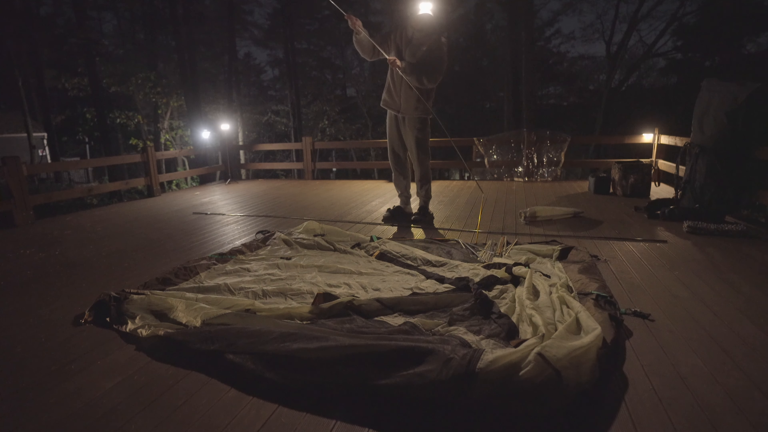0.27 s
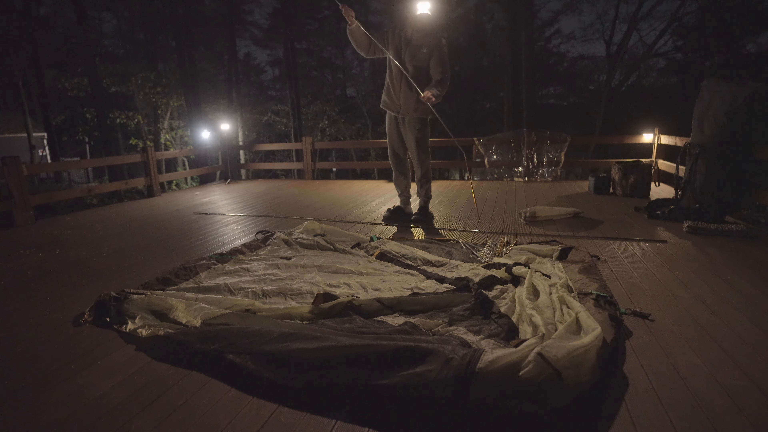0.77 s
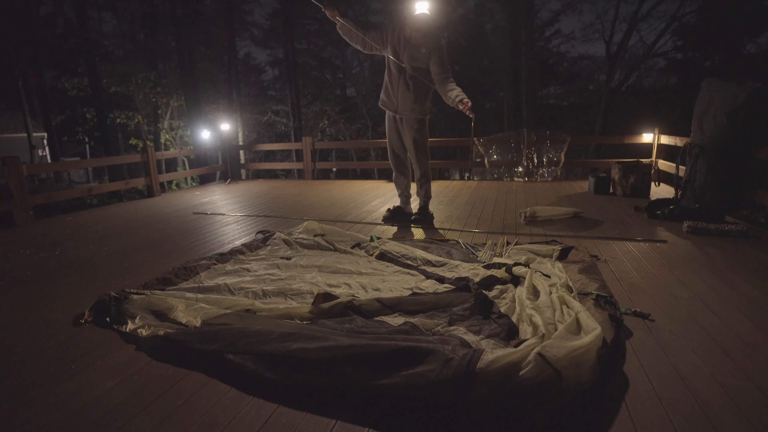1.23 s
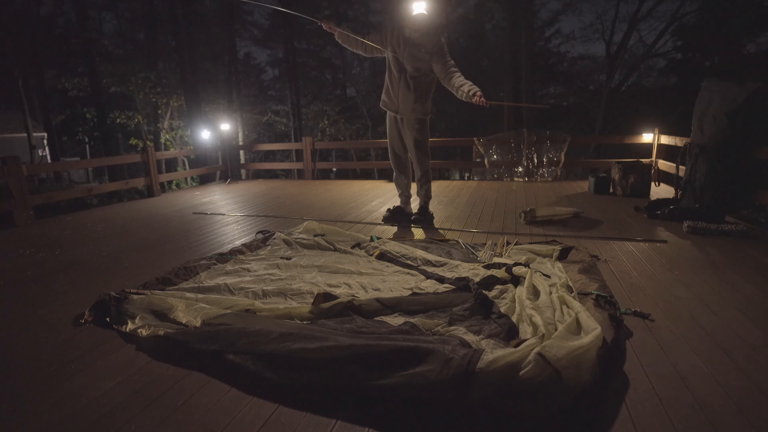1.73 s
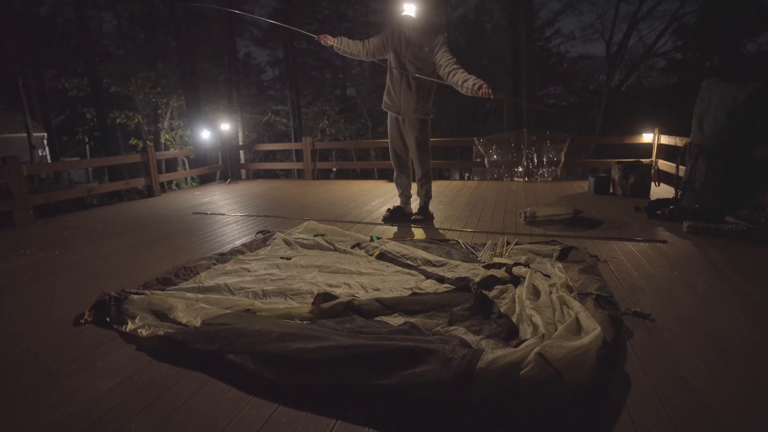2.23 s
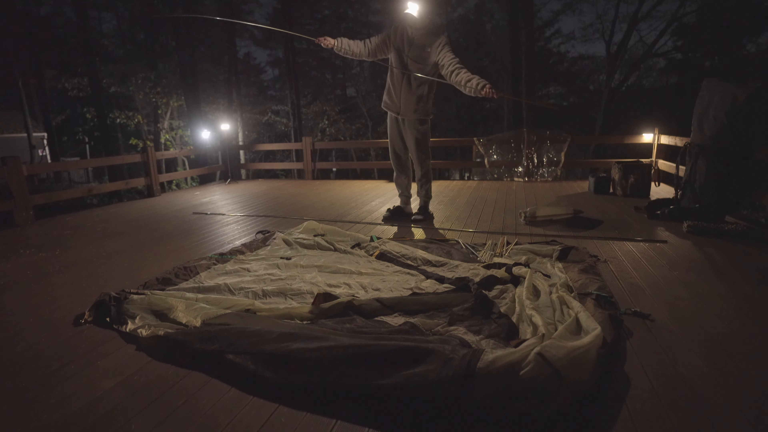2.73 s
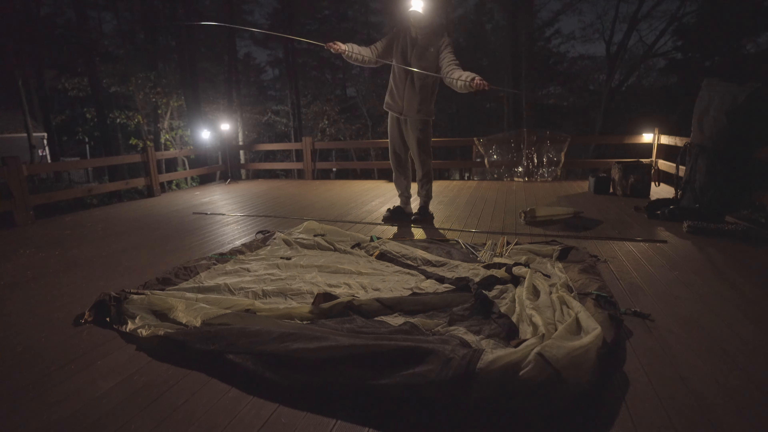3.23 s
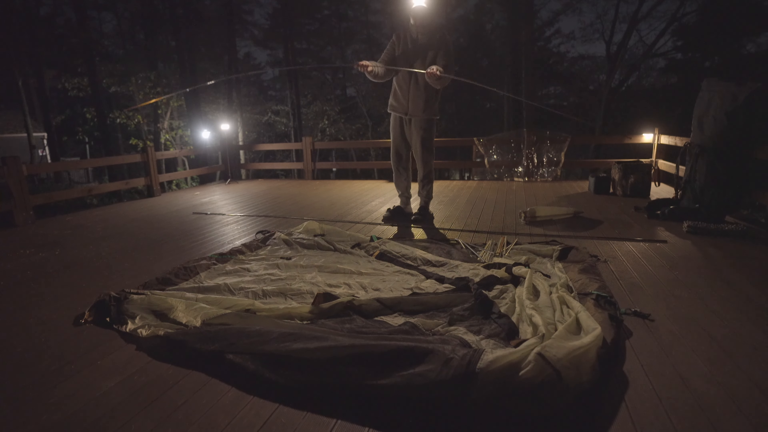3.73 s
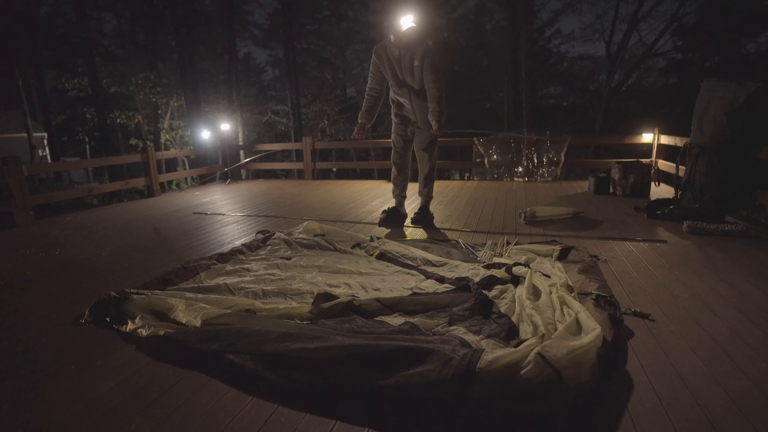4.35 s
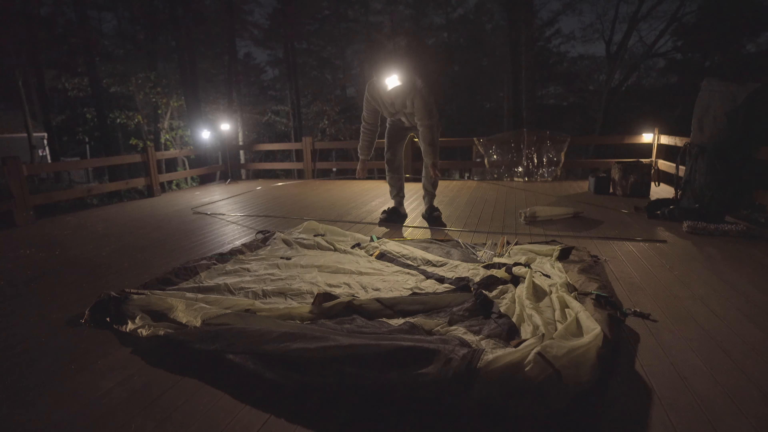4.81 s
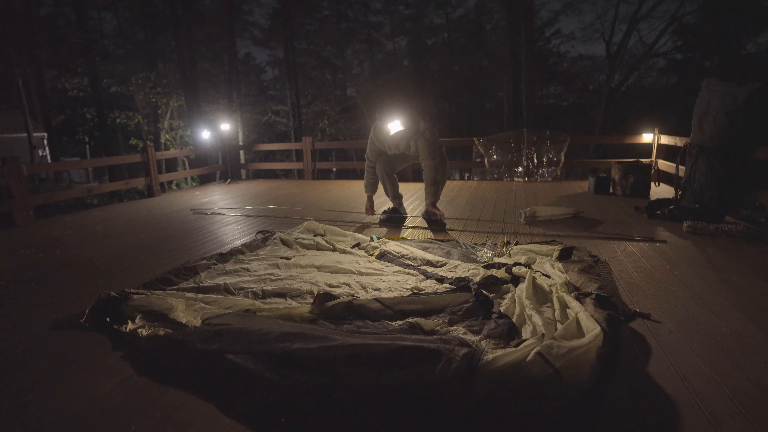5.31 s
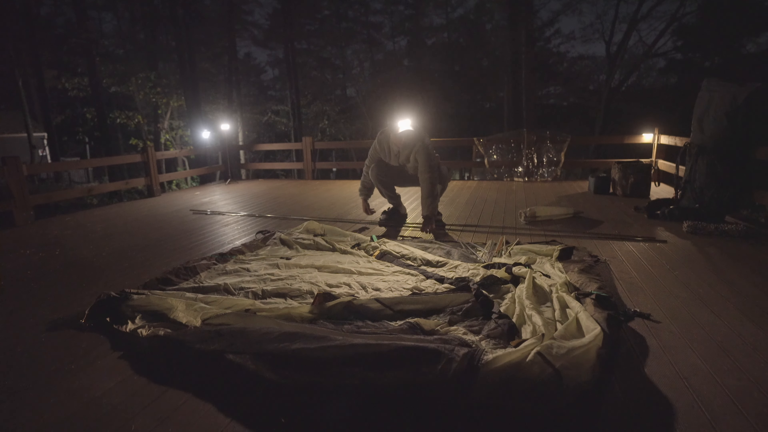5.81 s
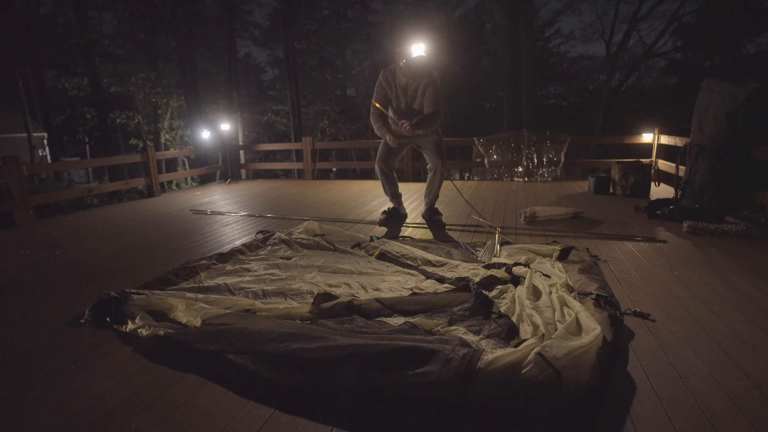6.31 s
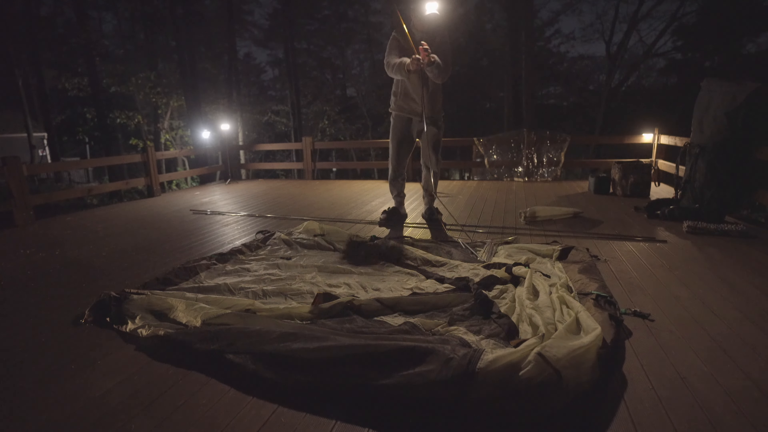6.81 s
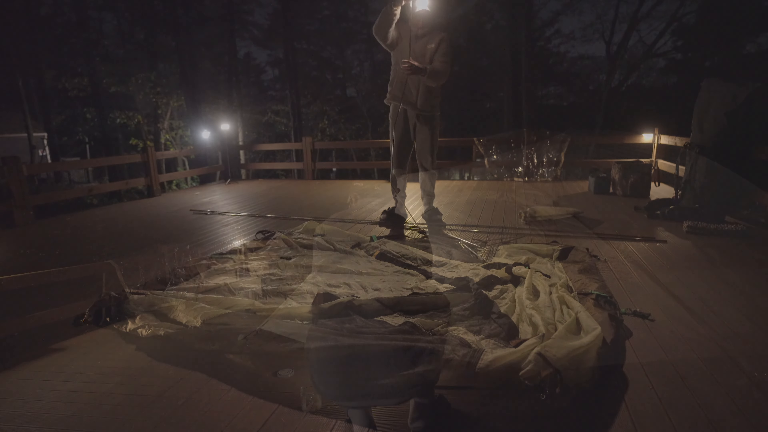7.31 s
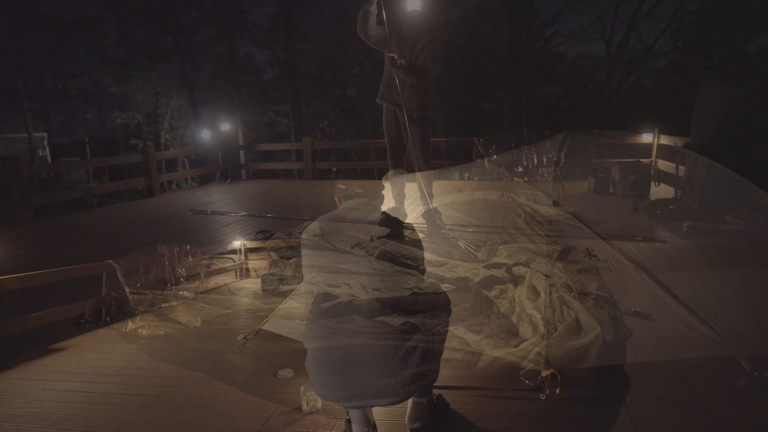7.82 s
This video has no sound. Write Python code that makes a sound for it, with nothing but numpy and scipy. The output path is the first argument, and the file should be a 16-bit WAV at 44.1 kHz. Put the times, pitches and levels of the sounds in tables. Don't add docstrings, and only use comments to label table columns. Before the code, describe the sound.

Close stereo pickup on a quiet outdoor wooden deck at night. A bright metallic snap opens, followed by small ticks and near silence with a few isolated clicks. Midway, thin tent poles drop, clattering and knocking on hollow boards. Then scrapes, nylon rustle and crisp joint snaps come in dense irregular bursts, ending with a short zip buzz.

```python
import sys
import numpy as np
from scipy import signal
from scipy.fft import rfft, irfft, next_fast_len
from scipy.io import wavfile
from scipy.ndimage import uniform_filter1d, map_coordinates

SR = 44100
rng = np.random.default_rng(int(sys.argv[2]) if len(sys.argv) > 2 else 0)


def voltage_ratio(level):
    return 10 ** (np.asarray(level, float) / 20)


def to_wav(sig):
    pcm = np.clip(np.atleast_2d(sig), -1, 1) * 32767
    pcm = np.round(pcm).astype(np.int16)
    wavfile.write(sys.argv[1], SR, pcm.T)


N = 355887
LENGTH = 16384
T = np.arange(LENGTH) / SR
HZ = np.fft.rfftfreq(LENGTH, 1 / SR)

# (frequency [Hz], width [Hz], level [dB])
TUBE_MODES = [(2590, 660, -7), (3920, 235, 10.5), (5000, 1700, -18), (5630, 160, 3), (7660, 310, -19),
              (8280, 220, 4), (10300, 140, -14), (11220, 240, 4), (12700, 140, -6), (13260, 250, 3),
              (14100, 130, -10)]
# (time [s], peak level [dB], loudest ring [Hz], presence under 5 kHz [dB])
SNAPS = [(0.0317, -3, 9500, -23), (1.3121, -28, 3710, -14.5), (1.355, -32.5, 7600, -15),
         (1.3967, -24.5, 14600, -16), (2.363, -9.5, 7220, -18), (6.0584, -27, 2500, -2),
         (6.112, -22.5, 10600, -20), (6.3719, -17.5, 7500, -16), (6.4442, -6, 14100, -14.5),
         (6.5066, -12, 10740, -13), (6.7469, 0.5, 14800, -29.5), (6.7625, -10.5, 8800, -21.5),
         (7.7332, -28.5, 6450, -24), (7.7792, -33.5, 8810, -16), (7.8014, -14, 7160, -13.5),
         (7.8816, -29, 13100, -17), (7.8965, -7.5, 10000, -18.5)]
# (time [s], peak level [dB], loudest ring [Hz], presence under 5 kHz [dB])
REBOUNDS = [(.0331, -4, 4800, -14.5), (.0345, -9, 2800, -8), (.052, -14, 8800, -15), (.066, -19, 9000, -18),
            (.0905, -39, 2800, -5), (.1035, -32, 3200, -5), (1.3175, -31, 3920, -10),
            (1.3995, -26, 7850, -13), (1.4125, -34, 14500, -12), (2.3645, -11, 12800, -14.5),
            (5.9353, -34, 7470, -12), (6.451, -17, 5910, -6), (6.5565, -29, 4000, -4),
            (6.6467, -23, 2580, -12), (6.668, -13, 6040, -16), (6.678, -16, 9000, -15),
            (6.712, -24, 6000, -17), (6.9145, -9, 11500, -22), (6.924, -12, 13500, -21),
            (6.9984, -24, 15500, -25), (7.2585, -20, 13500, -14), (7.267, -21, 12500, -6),
            (7.4564, -39, 2750, -5), (7.81, -37, 14900, -18), (7.819, -33, 12700, -25),
            (7.8585, -36, 12000, -16)]
# (time [s], peak level [dB], loudest ring [Hz], presence under 5 kHz [dB])
CLATTER = [(4.8584, -14, 6450, -11), (4.9047, -30.5, 4040, -4), (5.058, -21.5, 3800, -7.5),
           (5.1034, -11, 3630, -13), (5.4163, -10, 7260, -9), (5.423, -6, 2530, -11.5),
           (5.4994, -13, 3770, 3), (5.5074, -11.5, 3570, -8.5), (5.566, -3, 7100, -11.5),
           (5.6082, -17, 4230, -12), (5.6214, -20.5, 2850, -23), (5.651, -12.5, 2780, -22),
           (6.904, -2, 15600, -19.5), (7.0903, -13.5, 4100, 2), (7.1518, -10, 8300, -18.5),
           (7.224, -10, 4080, -7), (7.2394, -15, 4050, 22), (7.2969, -15.5, 3730, -13)]
# (time [s], peak level [dB], loudest ring [Hz], presence under 5 kHz [dB])
BRUSHES = [
    (.046, -12, 8800, -18.5),
    (5.8092, -31.5, 5340, -18),
    (5.8461, -27, 10440, -12),
    (5.85, -24.5, 5750, -12.5),
    (6.0117, -27, 7530, -13),
    (6.659, -14, 6040, -11),
    (6.8435, -29, 12700, -14),
    (7.0404, -15.5, 12000, -18.5),
    (8.051, -21, 15500, -9),
]
# (time [s], peak level [dB], loudest ring [Hz], presence under 5 kHz [dB])
SCUFFS = [
    (5.9744, -29, 8250, -11),
    (6.256, -25.5, 8450, -9),
    (6.2786, -15, 6800, -17),
    (6.636, -18, 3900, -9),
    (7.0687, -5, 14440, -10),
]
# (time [s], peak level [dB], loudest ring [Hz], presence under 5 kHz [dB])
TICKS = [
    (0.111, -26, 6900, -12),
    (0.1615, -30, 2650, -13),
    (0.254, -38.5, 6070, -10),
    (0.547, -31, 8500, -16),
    (0.588, -43, 3430, -3),
    (0.6509, -40, 10600, -21),
    (4.2048, -45, 2980, 15),
    (4.5765, -38, 2700, 2),
    (7.59, -45, 2800, 10),
]
# (t60 [s], treble over 11 kHz [dB])
SNAP, REBOUND, CLANK = (0.05, -16), (0.038, -17), (0.068, -19)
BRUSH, SCUFF, TICK = (0.087, -17.5), (0.15, -14), (0.062, -14)


def metal_contacts():
    out = np.zeros((2, N + LENGTH))
    groups = [(SNAPS, SNAP), (REBOUNDS, REBOUND), (CLATTER, CLANK), (BRUSHES, BRUSH), (SCUFFS, SCUFF), (TICKS, TICK)]
    for table, (t60, treble_db) in groups:
        rise = .00015 + .06 * t60 ** 2
        for s, db, ring_hz, presence_db in table:
            slope = [(800, presence_db - 13), (2600, presence_db), (4500, presence_db + 1.5),
                     (7000, -10.5), (9500, -13.0), (12000, treble_db + 2.0)]
            modes = 0.97 + resonant(TUBE_MODES, HZ, vary_db=2.5) + resonant([(ring_hz, 420, 7)], HZ)
            crack = burst(t60, rise=rise, snap_db=15 - 136 * t60, tail_db=-17, tail_t60=6.2 * t60)
            add(out, s - .0005, crack * voltage_ratio(along(slope, HZ)) * modes, db - 12.5)
    return out[:, :N]


# (frequency [Hz], width [Hz], level [dB])
BOARD_MODES = [(116, 61, -10), (206, 43, -6), (289.6, 20.5, -3), (341.3, 8.8, 1), (390, 31, -1.5),
               (494.5, 37, 0.5), (627, 106, -5), (689.3, 19.4, 5.5), (772, 78, -4.5), (910, 40, 5),
               (985, 150, -6.5), (1168, 82, 3.5), (1370, 125, -7.5), (1640, 216, 1.5), (1970, 520, -9.5),
               (2222, 24, -0.5), (2650, 55, -39)]
# (time [s], peak level [dB], t60 [s], loudest ring [Hz])
BLOWS = [(4.859, -24.5, 0.2, 1574), (5.058, -30.5, 0.25, 861), (5.102, -20, 0.27, 786),
         (5.42, -9, 0.16, 1037), (5.434, -16.5, 0.18, 860), (5.504, -16.5, 0.21, 725),
         (5.566, -7.5, 0.093, 1050), (5.608, -19, 0.34, 613), (5.647, -12.5, 0.079, 1664),
         (6.644, -17, 0.22, 1007), (7.072, -12, 0.22, 1380), (7.11, -20.5, 0.16, 740),
         (8.047, -27.5, 0.15, 1090)]
# (time [s], peak level [dB], t60 [s], loudest ring [Hz])
TAPS = [(0.029, -32.5, 0.067, 995), (0.359, -45.5, 0.26, 824), (0.545, -39, 0.047, 1033),
        (6.056, -27.5, 0.054, 1048), (6.299, -23, 0.24, 1010), (6.622, -29, 0.21, 927),
        (6.718, -27, 0.22, 1025), (6.775, -32, 0.06, 990), (6.815, -29, 0.12, 1015),
        (6.859, -30, 0.14, 1010), (6.901, -34, 0.03, 1370), (7.238, -13.5, 0.13, 1340),
        (7.295, -18, 0.04, 1344)]
# (time [s], peak level [dB], t60 [s], loudest ring [Hz])
SKIPS = [
    (.099, -35, .15, 990),
    (.171, -35, 0.088, 1000),
    (.21, -36, .12, 800),
    (.235, -49, .1, 1170),
    (5.625, -20.5, 0.063, 1700),
    (5.66, -19, 0.1, 1190),
    (6.15, -34.5, 0.14, 806),
    (6.222, -32, 0.15, 1020),
]
# (time [s], peak level [dB], t60 [s], loudest ring [Hz])
CHIMES = [
    (0.059, -35.5, 0.25, 985),
    (0.154, -40, 0.2, 1000),
    (6.273, -19, 0.08, 1010),
    (7.591, -37, 0.091, 764),
]
# (time [s], peak level [dB], t60 [s], loudest ring [Hz])
STEPS = [
    (0.187, -35, 0.17, 970),
    (4.207, -29, 0.083, 810),
    (4.269, -38.5, 0.13, 364),
    (4.87, -30, 0.21, 613),
]
# (share of the loudest ring [dB], thud under 500 Hz [dB])
BLOW, TAP, SKIP, CHIME, STEP = (-9.5, -16), (0.57, -12), (-2, -14), (31, -19), (-0.41, 5.1)


def deck_blows():
    out = np.zeros((2, N + LENGTH))
    low = 1 / (1 + (HZ / 560) ** 4)
    for table, (ring_db, thud_db) in [(BLOWS, BLOW), (TAPS, TAP), (SKIPS, SKIP), (CHIMES, CHIME), (STEPS, STEP)]:
        for s, db, t60, ring_hz in table:
            wood = resonant(BOARD_MODES, HZ, vary_db=2.5)
            hump = voltage_ratio(-3 * np.log2((HZ + 30) / ring_hz) ** 2)
            upper = (1 - low) * hump * (0.35 + wood) + resonant([(ring_hz, 26, ring_db + 12.0)], HZ)
            knock = upper * burst(t60, rise=0.00048, snap_db=7.0, tail_db=-23.5, tail_t60=0.99)
            thump = burst(2.96 * t60, rise=0.0019, snap_db=15, tail_db=-10.0, tail_t60=1.0)
            thud = voltage_ratio(thud_db + 9.0) * low * wood * thump
            add(out, s - .001, knock + thud, db - 8.0)
    return out[:, :N]


# (time [s], frequency [Hz], peak level [dB], t60 [s])
RINGS = [(.06, 770, -46, 0.33), (.16, 770, -48, 0.67), (.185, 2810, -61, 0.2), (1.402, 2650, -46, 0.078),
         (4.206, 1490, -49, 0.032), (4.211, 223, -42, 0.52), (4.864, 505, -48, 0.7),
         (4.865, 662, -40, 0.27), (5.109, 304, -42, 0.97), (5.11, 517, -59, 0.64), (5.43, 402, -24, 0.2),
         (5.45, 297.5, -24.5, 0.22), (6.748, 12600, -42, .4), (6.88, 786, -44, 0.35),
         (6.904, 3220, -29, 0.038), (6.907, 15500, -33, .08), (7.075, 194, -34.5, 0.25),
         (7.252, 800, -19, 0.22),
         (.06, 1450, -53.5, .4), (.185, 1420, -53, .3), (.23, 3100, -58, .12), (5.436, 660, -24, 0.14),
            (5.57, 1300, -22, .12), (7.075, 1130, -26, 0.11), (7.115, 390, -35, .6),
            (7.238, 2100, -24, 0.057), (7.96, 270, -49, .2), (8.045, 1180, -33.5, .15),
            (5.568, 950, -21, .12), (7.072, 1450, -21.5, .08), (7.08, 740, -29, .3),
            (7.296, 760, -26, 0.24), (6.748, 8950, -39, .25), (6.748, 13000, -42, .2),
            (6.906, 11900, -45, .2), (.157, 2200, -50, .06), (5.103, 1080, -28, .08),
            (5.103, 1780, -34, .1), (5.18, 1780, -43.5, 0.13), (.1, 980, -44, .2), (.21, 980, -47.5, .3),
            (6.325, 480, -42, 0.31), (6.275, 1050, -27, .2), (5.423, 560, -23, .2), (5.425, 1390, -25, .1),
            (5.11, 500, -37, .6), (7.47, 500, -44, .4), (7.725, 490, -52, .4), (6.25, 750, -38, .4),
            (5.44, 1050, -24, .12), (5.75, 650, -40, .3), (7.33, 1150, -36, .2)]


def ringing():
    out = np.zeros((2, N + SR))
    t = np.arange(SR // 2) / SR
    for s, hz, db, t60 in RINGS:
        pace = 35 + hz / 40
        strength = voltage_ratio(3.0 * wobble(pace, size=len(t)))
        phase = 2 * np.pi * hz * t + 1.4 * wobble(pace, size=len(t))
        decay = (1 - np.exp(-t / 0.0013)) * voltage_ratio(db - 60 * t / t60)
        pan_db = side_db(s, hz)
        tone = decay * strength * np.sin(phase)
        out[:, round(s * SR):][:, :len(t)] += tone * voltage_ratio([[pan_db / 2], [-pan_db / 2]])
    return out[:, :N]


# (time [s], hold [s], level [dB], low-frequency weight [dB])
SHAKES = [(0.048, 0.14, -45.5, -7), (0.525, 0.034, -50.5, -3), (4.35, 0.58, -61.5, -12),
          (5.19, 0.0092, -42.5, -5), (5.604, 0.01, -21, -10.5), (5.791, 0.66, -45, -7.5),
          (7.115, 0.088, -29.5, -11.5), (7.236, 0.08, -29.5, -8), (7.41, 0.095, -44.5, 0),
          (7.72, .06, -53, -4.5), (7.88, .08, -50, 1), (8.015, .05, -38.5, -10.5)]
# (frequency [Hz], level [dB per Hz])
RATTLE_SPECTRUM = [(300, -36), (700, -4), (1100, 6), (1700, -1), (2500, -8), (5000, -22.5)]
# (frequency [Hz], level [dB per Hz])
RUMBLE_SPECTRUM = [(60, -10.5), (150, -7), (300, -4), (600, -9), (900, -9.5), (2000, -44)]


def shaking():
    def alike(f):
        return along(NEAR_ALIKE, f)

    def rattle_response(f):
        return voltage_ratio(along(RATTLE_SPECTRUM, f)) * (2.9 + resonant(BOARD_MODES, f))

    def rumble_response(f):
        return voltage_ratio(along(RUMBLE_SPECTRUM, f)) * (0.52 + resonant(BOARD_MODES, f))

    rattle_rows = [(s, hold, db) for s, hold, db, _ in SHAKES]
    rumble_rows = [(s, hold, db + weight) for s, hold, db, weight in SHAKES]
    rattle_db = strokes(rattle_rows, rise_db_per_s=315, fall_db_per_s=97)
    rumble_db = strokes(rumble_rows, rise_db_per_s=248, fall_db_per_s=72)
    rattle = unit(voltage_ratio(3.6 * wobble(45)) * rush(rattle_response, alike))
    rumble = unit(voltage_ratio(2.0 * wobble(25)) * rush(rumble_response, alike))
    return voltage_ratio(rattle_db - 8.5) * rattle + voltage_ratio(rumble_db - 1.4) * rumble


# (time [s], hold [s], level [dB])
SLIDES = [
    (.06, 0.17, -52),
    (.39, 0.0074, -57),
    (5.94, 0.085, -38),
    (6.16, .08, -46.5),
    (6.25, 0.094, -33),
    (6.64, .01, -59),
]
# (frequency [Hz], width [Hz], level [dB])
SCRAPE_MODES = [(484, 51, -4), (770, 150, -7), (1010, 91, -2), (1131, 26, 3.5), (1493, 24, -5),
                (1970, 560, -13.5)]


def sliding():
    level_db = strokes(SLIDES, rise_db_per_s=344, fall_db_per_s=256)
    slips = voltage_ratio(2.2 * wobble(55) + 2.5 * wobble(200))
    scrape = unit(slips * rush(lambda f: resonant(SCRAPE_MODES, f), lambda f: .5))
    return voltage_ratio(level_db - 5.5) * scrape * voltage_ratio([[-2.1], [2.1]])


# (time [s], hold [s], level [dB])
RUSTLES = [(0, 0.11, -51.5), (.15, 0.14, -56), (.5, .2, -74), (4.9, .1, -61), (5.08, 0.17, -58),
           (5.59, 0.45, -56), (5.99, 0.45, -46), (6.35, 0.36, -44), (6.78, 0.11, -41.5), (7, .01, -44.5),
           (7.1, .1, -38), (7.24, 0.0087, -33.5), (7.85, .15, -54), (8.07, .01, -43.5)]
# (frequency [Hz], level [dB per Hz])
NYLON_SPECTRUM = [(900, -29), (2000, 2.5), (4000, 3.5), (8000, 7), (12000, -2.5), (16000, -1)]


def nylon():
    level_db = strokes(RUSTLES, rise_db_per_s=102, fall_db_per_s=99)
    level_db = level_db + curves(SIDE_OF)[0] * np.array([[.5], [-.5]])
    crackle = voltage_ratio(wobble(40) + 1.3 * wobble(150) + 3.5 * wobble(650))
    rustle = unit(crackle * rush(lambda f: voltage_ratio(along(NYLON_SPECTRUM, f)), lambda f: .15))
    return voltage_ratio(level_db - 5.0) * rustle


# (time [s], tooth rate [teeth/s], level [dB], unevenness [0-1])
ZIP = [
    (7.81, 250, -70, .04),
    (7.835, 280, -51, .06),
    (7.865, 390, -55, .1),
    (7.9, 580, -55, .1),
    (7.94, 615, -50, .05),
    (7.97, 622, -49, .04),
    (8.01, 618, -41.5, .02),
    (8.07, 628, -40.5, .02),
]
# (frequency [Hz], level [dB])
TEETH_SPECTRUM = [(200, -2), (620, 0), (1240, -7), (1850, -8)]


def zip_pull():
    rate, db, uneven = curves([(0, 246.4, -130, 0.0016), (7.78, 250.9, -130, 0.0088), *ZIP])
    turn = 2 * np.pi * np.cumsum(rate * (1 + uneven * wobble(130))) / SR
    buzz = 0
    for k in range(1, 4):
        harmonic_db = along(TEETH_SPECTRUM, k * rate) - 5.5 * (k - 1) - 70 * uneven * (k - 2.0)
        phase = k * turn + .5 * (k - 1) * wobble(150)
        buzz = buzz + voltage_ratio(harmonic_db + 2.1 * wobble(90)) * np.sin(phase)
    hiss = rush(lambda f: resonant([(660, 370, -39), (1700, 850, 13)], f), lambda f: .6)
    rasp = (1.44 + np.sin(turn)) * hiss
    t = np.arange(N) / SR
    rasp_db = -48.5 + 62 * (t - t[-1]) - 400 * np.maximum(ZIP[1][0] - t, 0)
    return voltage_ratio(db + 3.0) * buzz + voltage_ratio(rasp_db) * rasp


# (time [s], frequency [Hz], level [dB])
ENGINE = [
    (4.36, 167, -69),
    (4.52, 174, -59),
    (4.95, 190.8, -63),
    (5.08, 199.4, -71),
    (5.3, 203, -65),
    (5.45, 205, -66),
]


def engine():
    hz, db = curves([(4.2, 160, -110), *ENGINE, (5.6, 220, -110)])
    return voltage_ratio(db + 7.0 + 2.2 * wobble(21)) * np.sin(2 * np.pi * np.cumsum(hz) / SR)


# (time [s], level [dB])
NIGHT = [
    (0, -55),
    (4, -56),
    (7.2, -51.5),
    (7.7, -55.5),
    (8.07, -57),
]
# (frequency [Hz], level [dB per Hz])
AIR_SPECTRUM = [(12, -37), (20, -11), (49, 0.5), (119, -4.5), (157, -1), (352, -7.5), (393, -6), (452, -9),
                (491, -7), (811, -11.5), (1230, -13), (3640, -21.5), (20000, -27.5)]
# (frequency [Hz], left-right likeness [-1 to 1])
AIR_ALIKE = [(60, 1.0), (130, 1), (290, 0.91), (640, 0.3), (1410, -0.11), (3100, -0.22), (6820, -0.011),
             (15000, 0.095)]


def night():
    level_db = curves(NIGHT)[0] + .4 * wobble(1.3) + np.array([[-.45], [.45]])
    return voltage_ratio(level_db) * rush(lambda f: voltage_ratio(along(AIR_SPECTRUM, f)), lambda f: along(AIR_ALIKE, f))


# (frequency [Hz], left-right likeness [-1 to 1])
NEAR_ALIKE = [(60, 1), (250, 1), (600, 0.87), (1500, 0.18), (15000, 0.034)]


def add(track, s, pair, db):
    turn = np.arccos(np.clip(along(NEAR_ALIKE, HZ), 0, 1)) / 2
    mid, side = pair * [np.cos(turn), np.sin(turn)]
    pan_db = np.interp(s, *np.transpose(SIDE_OF))
    lag_s = -pan_db * 1.5e-5
    shade = voltage_ratio(side_db(s, HZ) / 2) * np.exp(-1j * np.pi * HZ * lag_s)
    sound = irfft([(mid + side) * shade, (mid - side) / shade])
    height = np.sqrt(uniform_filter1d(np.mean(sound ** 2, 0), size=132).max())
    track[:, round(s * SR):][:, :LENGTH] += sound / height * voltage_ratio(db)


# (time [s], left minus right level [dB])
SIDE_OF = [(0, -3), (.05, 0), (.15, -2.5), (1.4, -7.5), (2.36, -6), (4.2, -1), (4.86, -3), (5.06, -1),
           (5.1, -8), (5.51, -8), (5.565, 0), (5.65, 0), (5.8, -7), (6.44, -10), (6.9, -9), (7.04, -7.5),
           (7.07, -4), (7.11, -1), (7.15, -5.5), (7.3, -6.5), (7.78, -2.5), (7.89, -6), (8.05, -9)]
# (frequency [Hz], share [1])
SHADOW = [(200, 0), (1000, .4), (4000, .75), (12000, 1.5)]
# (time [s], further left minus right level [dB])
MIDDLE_SIDE = [(0, 0), (2.36, 3), (4.2, -2), (4.86, 7), (5.06, 6), (5.1, -5), (5.51, -2), (5.565, 4),
               (5.61, 1), (5.65, 3), (5.8, -2), (6.28, -4), (6.44, 0), (6.64, 2), (6.9, -2), (7.04, -3),
               (7.07, 1.5), (7.3, 2), (8.07, 1)]
# (frequency [Hz], share [1])
MIDDLE = [(400, 0), (900, 1), (3500, .8), (6500, 0)]


def side_db(s, hz):
    action_db = np.interp(s, *np.transpose(SIDE_OF)) * along(SHADOW, hz)
    return action_db + np.interp(s, *np.transpose(MIDDLE_SIDE)) * along(MIDDLE, hz)


def burst(t60, rise, snap_db, tail_db, tail_t60):
    snap = voltage_ratio(snap_db - 60 * T / 0.0074)
    chatter = voltage_ratio(-60 * T / t60)
    scatter = voltage_ratio(tail_db - 60 * T / tail_t60) * (1 - T / T[-1])
    return rfft((1 - np.exp(-T / rise)) * (snap + chatter + scatter) * rng.standard_normal((2, LENGTH)))


def resonant(modes, f, vary_db=0):
    total = 0
    for k, (centre, width, db) in enumerate(modes):
        strength = (-1) ** k * voltage_ratio(db + vary_db * rng.standard_normal())
        total = total + strength * 1j * f * width / (centre * centre - f * f + 1j * f * width)
    return total


def rush(response, alike):
    m = next_fast_len(N)
    hz = np.fft.rfftfreq(m, 1 / SR)
    turn = np.arccos(np.clip(alike(hz) + 0 * hz, -1, 1)) / 2
    noise = rfft(rng.standard_normal((2, m)))
    mid, side = irfft(noise * response(hz) * [np.cos(turn), np.sin(turn)], m)[:, :N]
    return unit(np.array([mid + side, mid - side]))


def strokes(rows, rise_db_per_s, fall_db_per_s):
    s, hold, db = np.transpose(rows)[:, :, None]
    t = np.arange(0, N / SR + .01, .002)
    before = np.maximum(s - t, 0)
    after = np.maximum(t - s - np.abs(hold), 0)
    level = db - rise_db_per_s * before - fall_db_per_s * after
    return np.interp(np.arange(N) / SR, t, level.max(axis=0))


def wobble(rate, size=N):
    knots = rng.standard_normal(int(size * 700 / SR) + 4)
    return map_coordinates(knots, [np.arange(size) * min(rate, 700) / SR])


def curves(rows):
    s, *cols = np.transpose(rows)
    return [np.interp(np.arange(N) / SR, s, c) for c in cols]


def along(points, hz):
    f, v = np.transpose(points)
    return np.interp(np.log(hz + 1), np.log(f + 1), v)


def unit(x):
    return x / np.sqrt(np.mean(x ** 2) + 1e-20)


def scene():
    pole = metal_contacts() + deck_blows() + ringing()
    movement = shaking() + sliding() + nylon() + zip_pull()
    return pole + movement + engine() + night()


def roll_off(x):
    return signal.sosfilt(signal.butter(12, 17040, fs=SR, output="sos"), x)


# (frequency [Hz], level [dB])
BAND = [(15750, 0), (15950, -36), (16900, -40), (17100, -90)]


def record(dry):
    m = next_fast_len(N)
    gain = voltage_ratio(along(BAND, np.fft.rfftfreq(m, 1 / SR)))
    kept = irfft(rfft(dry, m) * gain, m)[:, :N]
    return roll_off(kept)


dry = scene()
out = record(dry)
to_wav(out)
```